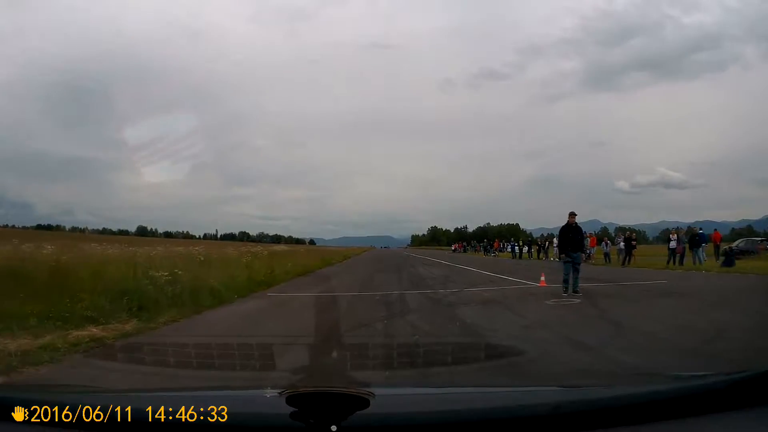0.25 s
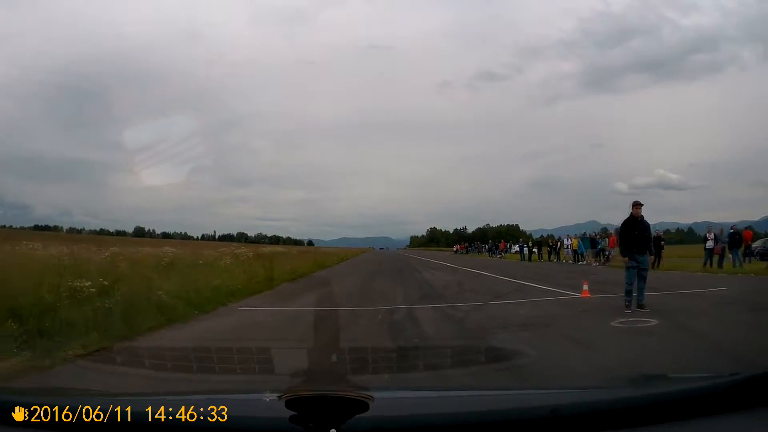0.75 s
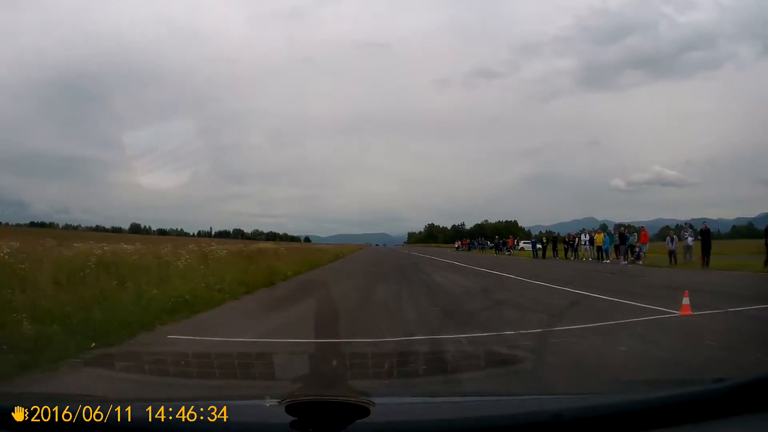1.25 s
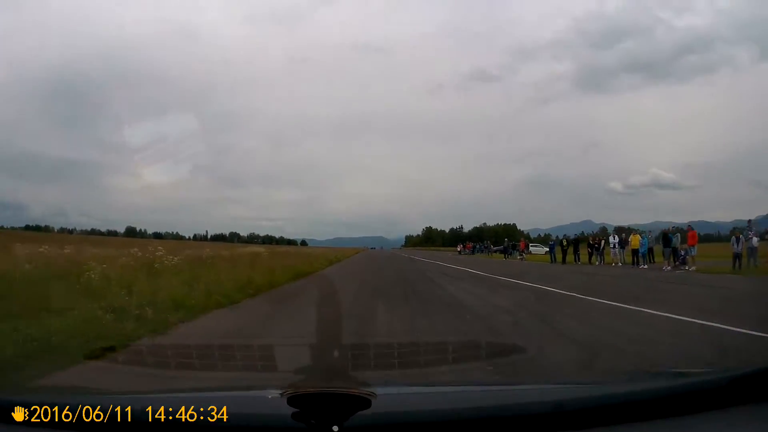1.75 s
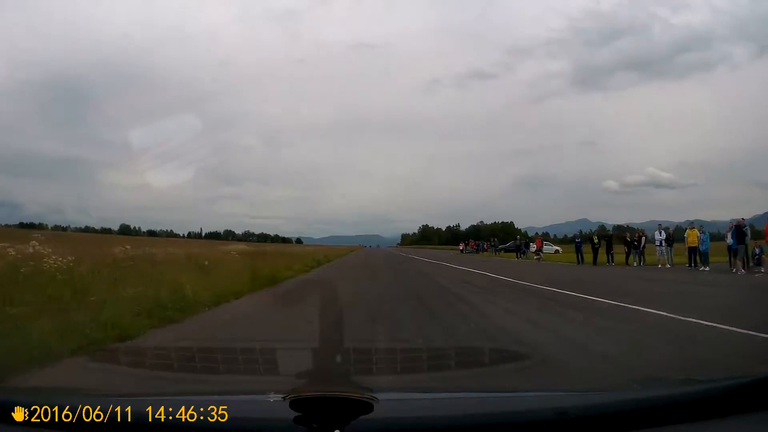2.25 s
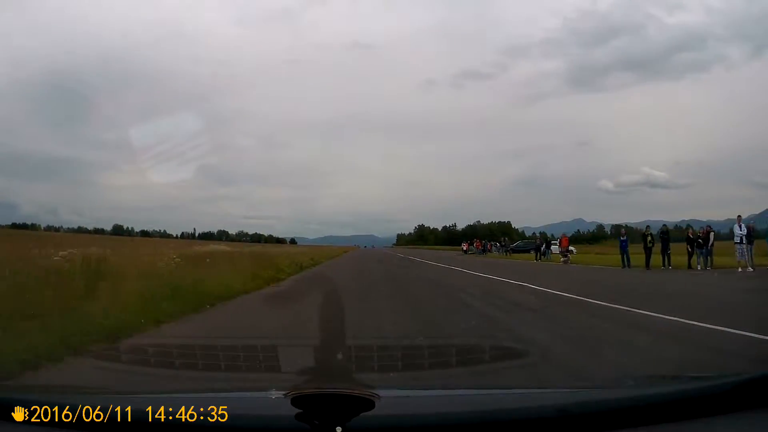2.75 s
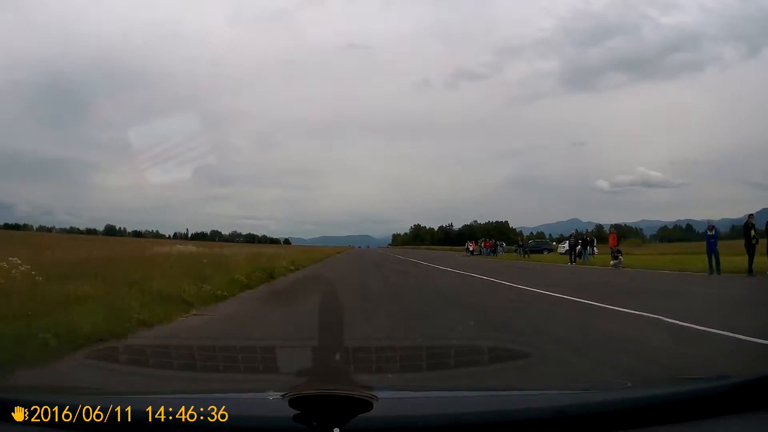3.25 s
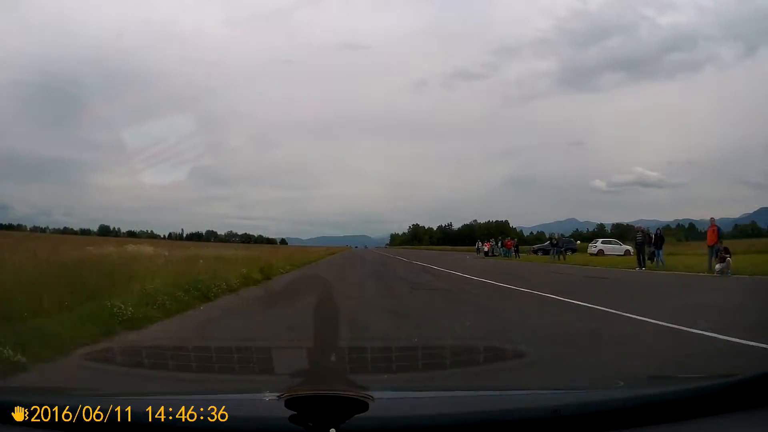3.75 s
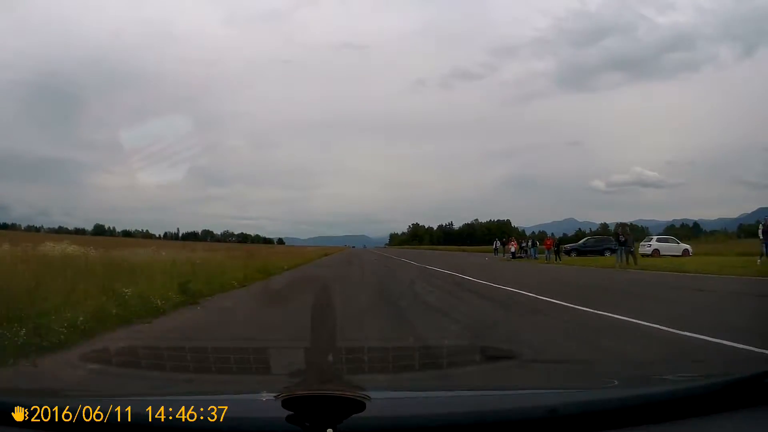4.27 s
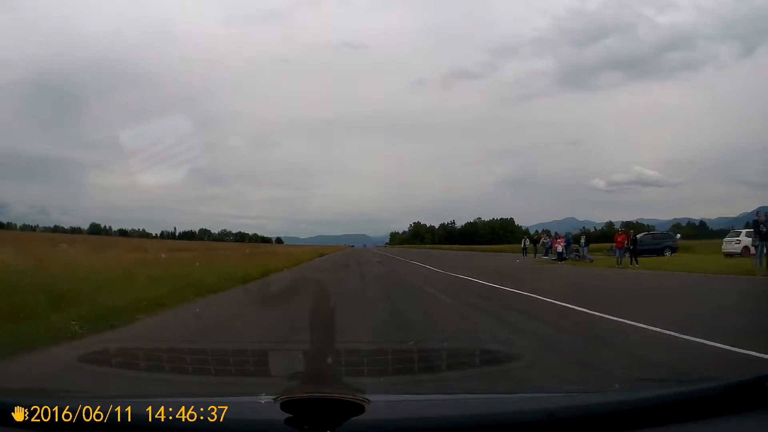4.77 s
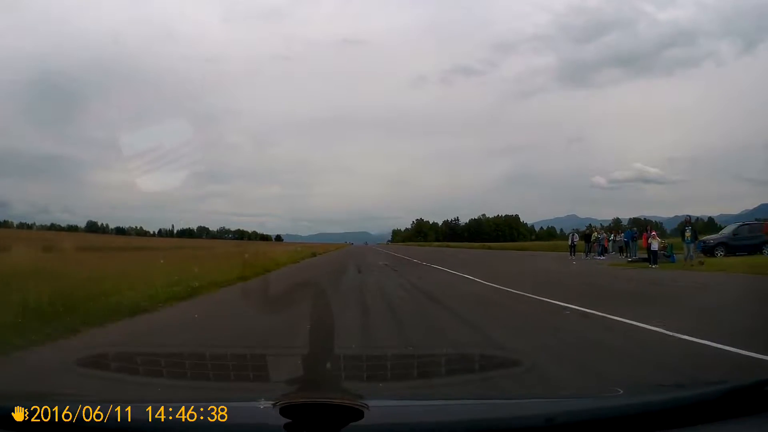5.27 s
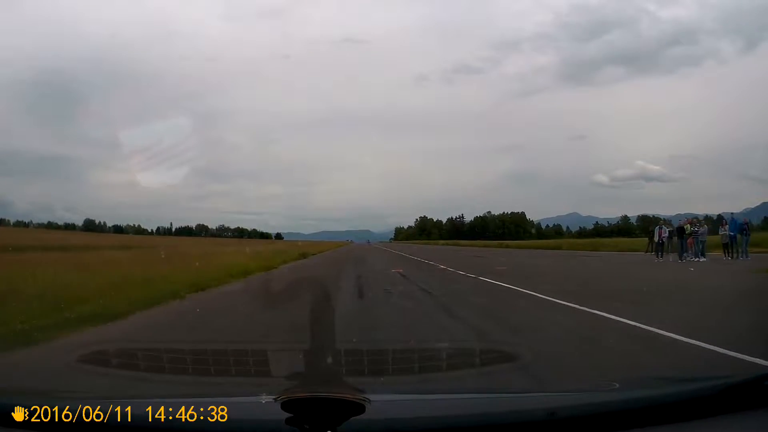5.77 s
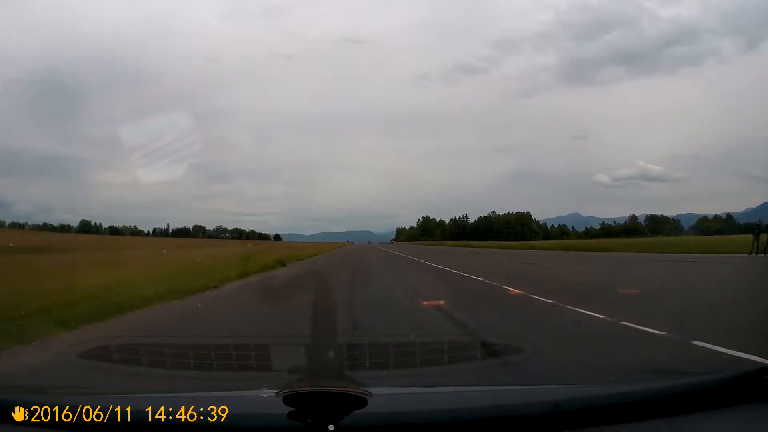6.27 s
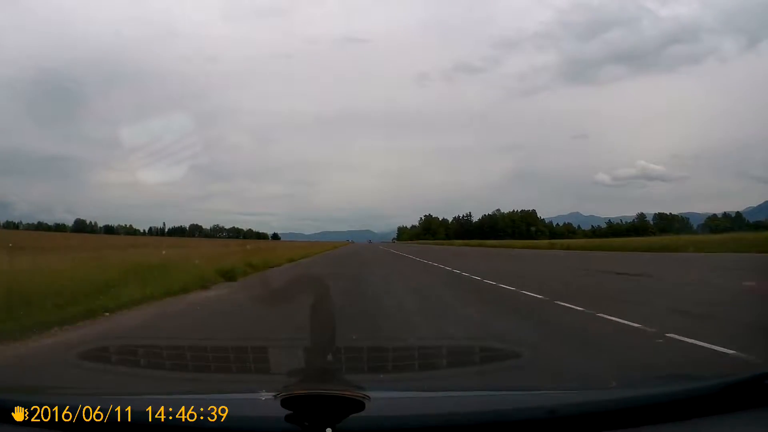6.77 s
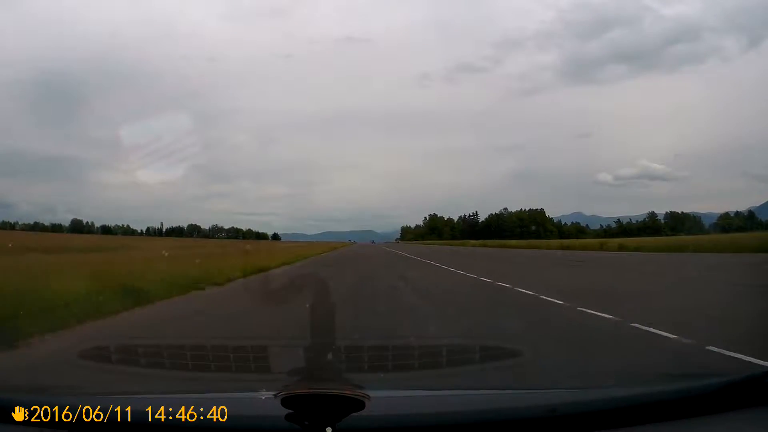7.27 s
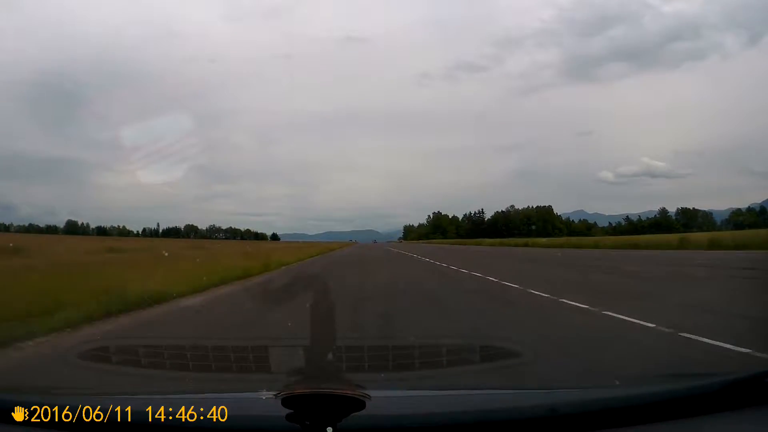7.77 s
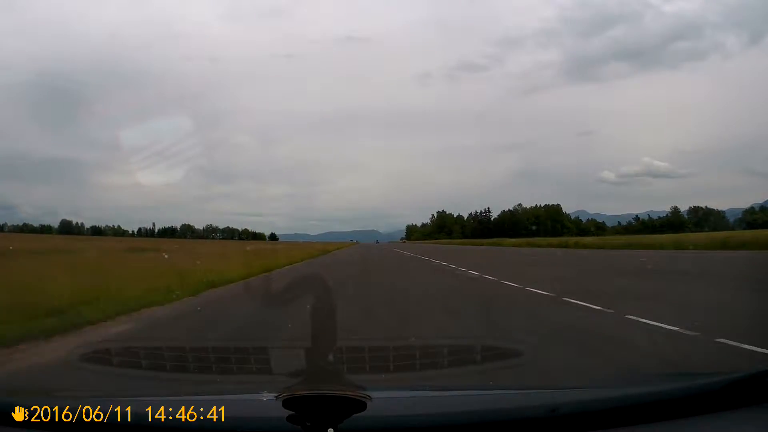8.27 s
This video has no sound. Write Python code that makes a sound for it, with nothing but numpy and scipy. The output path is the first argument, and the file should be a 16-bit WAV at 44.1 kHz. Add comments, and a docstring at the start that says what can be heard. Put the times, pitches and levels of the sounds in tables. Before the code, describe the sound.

A four-cylinder turbodiesel car revs up and launches, heard from a microphone on the windscreen. The wheels hop in rapid, distorted thumps while the dashboard slaps, trim knocks and the microphone's mount crackles up close. The engine bogs down, then climbs with a booming growl. A hard upshift brings knocks and a shudder, and the engine pulls again from a lower pitch over tyre roar and light ticking.

```python
"""Inside a four-cylinder turbodiesel car on a runway, the microphone in a camera on the windscreen.
The car launches; from 0.6 s the driven wheels hop and shake the body, overloading the microphone.
The dashboard slaps just below it, trim knocks, and the shaken camera crackles right at the capsule.
The engine bogs near 2 s, pulls through the gear, takes a hard upshift at 5.3 s and pulls again
over growing road roar, its firings booming and growling through the cabin."""
import sys
import numpy as np
from scipy import signal
from scipy.fft import rfft, irfft, next_fast_len
from scipy.io import wavfile
from scipy.ndimage import map_coordinates

SR = 44100
rng = np.random.default_rng(int(sys.argv[2]) if len(sys.argv) > 2 else 0)


def to_wav(sig):
    """Store sig (one row per channel, or 1-D mono) as 16-bit WAV at the path in sys.argv[1].

    Samples outside -1..1 are clipped; the rate is SR.
    """
    pcm = np.clip(np.atleast_2d(sig), -1, 1) * 32767
    pcm = np.round(pcm).astype(np.int16)
    wavfile.write(sys.argv[1], SR, pcm.T)  # frames by channels


N = 375732

# The runway under the car: (time [s], body rumble [dB], tyre roar relative to the growl [dB])
ROAD_LEVELS = [(0, -30.5, -0.5), (1.4, -28, -2), (2.2, -36, -1), (3.3, -34.5, -3.5), (4.8, -35.5, -4),
               (5.7, -40, -0.5), (6.2, -32, -0.5), (7.2, -32, -1.5), (8.5, -33.5, -2)]
# The clutch takes up, lets go and bites again: (time [s], length [s], rumble [dB], shudder [dB],
# dashboard rattle [dB], camera chatter [dB], throttle lift [0-1])
CLUTCH_LURCHES = [(0, 0.17, -42, -39.5, -48.5, -79, 0), (0.645, 0.53, -22, -45, -38, -37, 0.7),
                  (1.212, 0.083, -29, -38, -31, -60, 0.7), (1.44, 0.12, -29, -39, -29.5, -32.5, 0.2),
                  (1.584, .3, -29, -32, -42.5, -56, 0.6), (5.105, 0.2, -40, -41, -40.5, -49, 0.2),
                  (5.337, 0.19, -30, -22, -57, -65, .35)]
# Noise spectra, each (frequency [Hz], relative density [dB])
TYRE_SPECTRUM = [(30, -31.5), (70, -2), (115, 4.5), (160, -1), (200, -4.5), (320, -5), (450, -7),
                 (600, -11.5), (1200, -55.5), (4000, -100)]  # tyres, heard through the floor
RUMBLE_SPECTRUM = [(14, -24.5), (27, -1.5), (33, 0.5), (41, 2), (50, -3.5), (70, -7), (160, -40.5),
                   (1000, -120)]  # the body shell
RATTLE_SPECTRUM = [(200, -3), (510, 0.5), (680, -1), (860, 0), (1000, -12.5), (1120, -1.5), (1300, -10),
                   (1490, -8), (1750, -11.5), (1990, -19), (2600, -27.5), (3600, -30), (5000, -33.5),
                   (11000, -43.5), (15000, -66)]  # loose dashboard panels
SLAP_SPECTRUM = [(200, -10), (600, 6.5), (1000, 13.5), (1600, -1), (2600, -20), (4000, -23.5), (9000, -33),
                 (14000, -52.5)]  # the dashboard hitting its seat
COMBUSTION_SPECTRUM = [(250, -7), (450, 0.5), (650, -1.5), (850, -4), (1150, -4.5), (1450, -11.5),
                       (1800, -18), (2400, -26.5), (3000, -33.5), (4500, -44.5), (8000, -55.5),
                       (12000, -95.5)]  # firings, heard through the bulkhead
DULL_SCUFF = [(200, -9), (600, 4.5), (950, 5), (1300, -11), (1700, -16), (2100, -16), (2700, -19),
              (3600, -33), (4500, -30), (5500, -48), (12000, -65.5)]  # trim contact, dull part and bright part
BRIGHT_SCUFF = [(800, -33), (1600, 6), (2600, 1.5), (3000, -8), (3500, -7.5), (3900, -13), (4300, -7),
                (5000, -34), (12000, -51.5)]
HISS_SPECTRUM = [(1000, 0), (10000, 0), (12000, -6), (15000, -10), (16000, -30)]  # microphone self-noise
# Ringing parts, each (frequency [Hz], relative level [dB], t60 [s])
METAL_MODES = [(2600, 2, .05), (2880, 7.5, 0.046), (3052, 0, 0.059), (3472, 5.5, 0.056), (3880, -3, .05),
               (4285, -6, 0.12), (4430, -10, .06)]  # a small loose piece
TRIM_MODES = [(565, -3.5, 0.075), (858, 3, 0.049), (1031, 4.5, 0.034), (1240, -8, 0.057),
              (1630, -20, 0.0033), (2000, -19, 0.016), (2530, -14, 0.023), (2820, -17.5, 0.036)]  # gear lever and plastic trim
PANEL_MODES = [(329, 0, .09), (377, -2.5, 0.1), (516, -3, 0.082), (620, -1, .09), (805, -1.5, .05),
               (943, -5, 0.057), (977, -1, 0.058), (1112, -5, .08), (1217, -6, .07), (1490, -5.5, .09),
               (1980, -18.5, 0.1), (2480, -18, .05)]  # dashboard
CASE_MODES = [(3650, -24, .016), (5160, -29, 0.016), (7160, -31.5, .01), (8500, -29.5, 0.0095)]  # camera case
MOUNT_MODES = [(120, 7, 0.12), (153, 3, 0.14), (233, -7.5, 0.024), (311, -5, 0.098), (400, -13.5, 0.1),
               (518, -0.5, 0.069), (620, -8, 0.07)]  # engine mounts
# Lever and trim blows: (time [s], relative level [dB], bright scuff [dB], pitch [ratio])
TRIM_KNOCKS = [(.566, -15.5, -20, 0.55), (1.249, -15.5, -24, 1.22), (1.276, -9, -15, 1.4),
               (1.291, -18.5, -26, 1.13), (1.307, -7, -11.5, 0.97), (2.498, -23, -8, 1.24),
               (2.975, -43, 3, 1.4), (5.083, -29.5, 4, 1.1), (5.208, -12.5, -20, 1.01),
               (5.243, -6.5, -13, .9), (5.446, -37, 3, 1.4)]
# Dashboard blows: (time [s], relative level [dB])
DASH_SLAPS = [(0.732, -12), (0.802, -9.5), (0.843, -3.5), (0.85, -3.5), (0.9308, -10), (0.939, -10),
              (1.022, -11.5), (1.027, -8.5), (1.106, -18), (1.216, -17.5), (1.226, -18.5), (1.453, -13.5),
              (1.460, -11.5), (1.474, -14), (1.488, -18), (1.51, -19), (1.522, -24.5), (1.54, -21)]
# The camera strikes its mount: (time [s], level [dB], buzz length [s])
CAMERA_TICKS = [(0.836, -13, .006), (0.969, -24, 0.0034), (1.077, -30.5, 0.0032), (1.097, -19, 0.0045),
                (1.110, -25, 0.011), (1.159, -33.5, 0.0032), (1.227, -18, 0.0024), (1.268, -24, .004),
                (1.302, -24, .003), (1.350, -35, .003), (1.381, -24.5, .004), (1.449, -16.5, 0.0026),
                (1.461, -16, 0.018), (1.492, -17, .007), (1.526, -22, 0.02), (1.560, -17, .003),
                (1.572, -16.5, 0.0033), (1.583, -23.5, .008), (1.620, -20.5, .003), (1.643, -19.5, 0.021),
                (1.680, -20, 0.0077), (1.704, -22, 0.017), (1.745, -20, 0.0035), (1.762, -23.5, .006),
                (1.773, -21.5, 0.011), (1.798, -19.5, 0.0036), (1.824, -28, 0.0053), (1.834, -27.5, 0.0064),
                (1.856, -25.5, 0.011), (1.880, -25.5, 0.015), (1.913, -24, .003), (1.921, -22, 0.0035),
                (1.937, -25, 0.0042), (1.949, -32.5, .003), (1.993, -22.5, 0.014), (2.047, -24.5, 0.0033),
                (2.103, -32, 0.012), (2.153, -40, .003), (4.259, -48, 0.0036), (4.687, -46.5, .006),
                (4.876, -49.5, .006), (4.914, -43, .006), (5.123, -26.5, 0.014), (5.146, -29, .004),
                (5.175, -27, .009), (5.228, -25.5, 0.0095), (5.283, -31, .006), (5.308, -35, .003),
                (5.337, -18, 0.0027), (5.345, -28, 0.0034), (5.361, -32, 0.0076), (5.388, -26.5, 0.0089),
                (5.414, -38, .003), (5.436, -41, .01), (5.543, -38, .005), (5.605, -28, 0.0062),
                (5.655, -37, 0.0058), (5.765, -32.5, .005), (5.867, -42, .005), (6.131, -39, 0.0066),
                (6.168, -35, 0.0023), (6.206, -35, 0.0027), (6.228, -34, 0.0046), (6.240, -39, 0.0086),
                (6.406, -44, .004), (6.424, -42, .007), (6.506, -37, .007), (6.560, -31.5, 0.017),
                (6.773, -33.5, .004), (6.794, -40, .004), (6.825, -36, .007), (7.007, -41, .005),
                (7.433, -33.5, .005), (7.452, -40, 0.0054), (7.474, -33, .005), (7.497, -31, .005),
                (7.511, -31, 0.0046), (7.577, -35, 0.0058), (7.613, -37, 0.0046), (7.715, -36.5, 0.0057),
                (7.919, -35.5, .005), (8.022, -31, 0.0097), (8.378, -44.5, .009)]
# The camera's responses, each (frequency [Hz], gain [dB])
CASE_COLOUR = [(300, -50), (1500, -9), (2400, 0.5), (3000, 1), (3650, 9), (4500, -5.5), (5200, 5),
               (6200, -2), (7200, 0.5), (7900, -2), (8700, -3.5), (10000, -8), (11500, -13.5),
               (12600, -21.5), (13600, -14.5), (15500, -38)]  # its case, tapped
CHATTER_COLOUR = [(300, -45.5), (1500, -12), (2400, 1.5), (3000, 1), (3700, 7), (4500, -10), (5200, 3),
                  (6200, -6), (7200, 0.5), (9900, 2.5), (11400, -4), (12500, -17.5), (13700, -8.5),
                  (15500, -35.5)]  # its case, struck hard
TREBLE_ROLLOFF = [(14000, 0), (15700, -14)]  # its dull top end
# The tyres regain grip: (time [s], length [s], shake [dB], shake rate [Hz], mount knock [dB],
# relative rattle [dB])
WHEEL_HOPS = [(0.636, 0.061, -7.5, 52.3, -14, -17.5), (0.721, 0.059, -2, 55.1, -4, -11.5),
              (0.803, .054, -1, 54.77, -0.5, -7.5), (.889, .053, -1, 52.2, 1, -9),
              (0.978, 0.044, -0.5, 52.25, -4.5, -11.5), (1.068, 0.047, -6, 50.8, -7.5, -16.5),
              (1.194, 0.041, -5, 49.5, -7.5, -15), (1.439, 0.03, -2.5, 37.97, -15.5, -17)]
# Launch, bog, pull, upshift, pull, at four firings a cycle: (time [s], cycle rate [Hz])
ENGINE_SPEED = [(0, 21), (.12, 22), (.25, 26.3), (.4, 30.5), (.6, 35.6), (.92, 34), (1.15, 36.3),
                (1.35, 38.7), (1.5, 36), (1.6, 30), (1.8, 21.2), (2, 19.3), (2.4, 21.8), (2.9, 25.3),
                (3.3, 27.9), (3.95, 31.8), (4.55, 34.86), (5.08, 37), (5.2, 39.4), (5.28, 36.8),
                (5.355, 40), (5.42, 35.3), (5.48, 30.8), (5.525, 30), (5.55, 24.8), (5.75, 25.2),
                (7.4, 29.5), (8.52, 32.05)]
# Harmonics of the unequal cylinders: (order [multiple of the cycle rate], relative level [dB])
ENGINE_ORDERS = [(2, 3), (3, 5), (5, 8), (6, -2), (7, 4), (9, 0.5), (10, -3), (11, -0.5), (12, .5),
                 (13, -8), (14, 1), (15, -4), (16, -6), (17, -9.5), (18, -3.5), (19, -4), (20, -2.5),
                 (22, -9), (23, -4.5), (24, -6.5), (25, -3.5), (26, -8), (28, -1), (31, 0), (32, 1),
                 (36, -4), (40, -8)]
# Cabin resonances at the windscreen, each (frequency [Hz], level [dB])
CABIN_GROWL = [(45, -8.5), (90, -13.5), (130, -3.5), (170, -10.5), (205, -3), (250, 4.0), (280, -6.5),
               (305, -0.5), (335, -1), (365, 9), (395, -1.5), (430, 9), (470, -1), (510, 2.5), (570, 0.5),
               (640, -3.5), (730, -2.5), (850, -5), (1100, -10), (1400, -10.5)]  # for the orders
CABIN_BOOM = [(79, -50), (92, -41.5), (107, -29.5), (114, -30.5), (127, -21.5), (137, -25), (146, -17.5),
              (155, -22.5)]  # for the firing rate
CABIN_OCTAVE = [(156, -37), (170, -30), (186, -33), (210, -30.5), (228, -35), (247, -28.5), (263, -37),
                (288, -34.5), (305, -30)]  # for its octave


def amp(db):
    """Decibels to gain."""
    return 10 ** (np.asarray(db) / 20)


def unit(x):
    """Scaled to rms 1."""
    return x / np.sqrt(np.mean(x ** 2) + 1e-20)


def along(points, hz):
    """(Hz, value) points read on a log axis."""
    f, v = np.transpose(points)
    return np.interp(np.log(hz + 1), np.log(f + 1), v)


def curves(rows):
    """One value per sample for each column after the time."""
    s, *cols = np.transpose(rows)
    return [np.interp(np.arange(N) / SR, s, c) for c in cols]


def wobble(rate):
    """A smooth random curve, rate knots a second."""
    return map_coordinates(rng.standard_normal(int(N * rate / SR) + 4), [np.arange(N) * rate / SR])


def filtered(x, response):
    """x through a gain that depends on frequency."""
    size = next_fast_len(N + SR // 2)
    return irfft(rfft(x, size) * response(np.fft.rfftfreq(size, 1 / SR)), size)[:N]


def noise(spectrum):
    """Coloured noise of rms 1."""
    return unit(filtered(rng.standard_normal(N), lambda hz: amp(along(spectrum, hz))))


def click(spectrum, size=512):
    """The shortest causal pulse with this colour, peak 1."""
    cepstrum = irfft(np.log(amp(along(spectrum, np.fft.rfftfreq(size, 1 / SR)))))
    causal = 2 * cepstrum[:size // 2] * (np.arange(size // 2) > 0)
    pulse = irfft(np.exp(rfft(causal, size)))
    return pulse / np.abs(pulse).max()


def ring(modes, t, scatter_db):
    """The decaying modes of a struck part, their strengths scattered at each blow."""
    hz, db, t60 = np.transpose(modes)[:, :, None]
    struck_db = db + scatter_db * rng.standard_normal(db.shape)
    return (amp(struck_db - 60 * t / t60) * np.sin(2 * np.pi * hz * t)).sum(0)


def add(track, s, sound):
    """Mix a sound into the track at time s."""
    part = track[round(s * SR):][:len(sound)]
    part += sound[:len(part)]


def microphone_hiss():
    """The microphone's own noise floor, far beneath the car."""
    return amp(-75.5) * noise(HISS_SPECTRUM)


def road(roar_db, rumble, shudder, rattle, shudder_hz=38):
    """Tyres roar below, the body rumbles all round; clutch shudder and dashboard rattle join in."""
    roar = amp(roar_db + 0.55 + 0.68 * wobble(10)) * noise(TYRE_SPECTRUM)
    swing = np.sin(2 * np.pi * shudder_hz * np.arange(N) / SR + 0.16 * wobble(30))
    flutter = amp(3.8 * wobble(45))
    body = rumble * noise(RUMBLE_SPECTRUM) + shudder * swing
    return roar + body + rattle * flutter * noise(RATTLE_SPECTRUM)


def lurches(attack_s=0.061, t60=0.41):
    """Each drivetrain lurch swells, holds and dies: rumble, shudder, rattle, chatter and lift curves."""
    t = np.arange(N) / SR
    total = np.zeros((5, N))
    for s, length, *levels_db, lift in CLUTCH_LURCHES:
        swell = np.clip((t - s) / attack_s + 0.5, 0, 1)
        release = amp(-60 * np.maximum(t - s - length, 0) / t60)
        total += np.outer([*amp(levels_db), lift], swell * release)
    return total


def metal_clink(at_s=2.503):
    """A small loose piece of metal is jogged and rings faintly in the cabin."""
    out = np.zeros(N)
    add(out, at_s, amp(-51.5) * ring(METAL_MODES, np.arange(SR // 5) / SR, scatter_db=2))
    return out


def trim_knocks(attack_s=0.0025, hold_s=0.0056, scuff_t60=0.054):
    """At arm's length, lever and trim strike with a short scuff and a dead plastic ring."""
    t = np.arange(SR // 5) / SR
    out = np.zeros(N)
    dull, bright = noise(DULL_SCUFF), noise(BRIGHT_SCUFF)
    onset = 1 - np.exp(-t / attack_s)
    fade = amp(-60 * np.maximum(t - hold_s, 0) / scuff_t60)
    for s, db, bright_db, pitch in TRIM_KNOCKS:
        scuff = (0.5 * dull + amp(bright_db) * bright)[round(s * SR):][:len(t)]
        plastic = 2.23 * ring(TRIM_MODES, t * pitch, scatter_db=2)
        add(out, s, amp(db - 11) * (plastic + scuff * fade) * onset)
    return out


def dashboard_slaps(crack_t60=0.0093, damping_t60=0.054):
    """Just below the microphone the dashboard slaps its seat: a dry crack, then ringing panels."""
    t = np.arange(SR // 8) / SR
    crack, panels = np.zeros((2, N))
    for s, db in DASH_SLAPS:
        add(crack, s, amp(db - 2.5 - 60 * t / crack_t60))
        add(panels, s, amp(db - 10 - 60 * t / damping_t60) * ring(PANEL_MODES, t, scatter_db=0))
    return crack * noise(SLAP_SPECTRUM) + panels


def camera_tick(db, length, gap_scatter, level_scatter, bounce_s=0.0034):
    """Impulses of the camera striking its mount, then rebounding in a fading buzz."""
    out = np.zeros(SR // 10)
    out[0] = amp(db)
    delays = np.cumsum(bounce_s * np.exp(0.3 * gap_scatter))
    rebounds_db = db - 3.5 - 14 * (delays / length) ** 2 + 2 * level_scatter
    for delay, rebound_db in zip(delays, rebounds_db):
        add(out, delay, amp([rebound_db]))
    return out


def camera_crackle(jolt, lurch_chatter, contacts_per_s=400, cabin_t60=0.082):
    """Right at the capsule the shaken case ticks, over a fine, brighter chatter that jolts stir up."""
    road_chatter = amp(-89 + 1.5 * np.arange(N) / SR)  # creeps up with time
    shaking = amp(-22.5) * jolt + lurch_chatter + road_chatter
    sizes = shaking * amp(2.8 * rng.standard_normal(N))
    contacts = sizes * (rng.random(N) < contacts_per_s / SR) * np.sign(rng.standard_normal(N))
    chatter = signal.fftconvolve(contacts, click(CHATTER_COLOUR))[:N]
    ticks = np.zeros(N)
    for s, db, length in CAMERA_TICKS:
        add(ticks, s, camera_tick(db, length, *rng.standard_normal((2, 10))))
    # each tick rings the case and scatters round the cabin
    t = np.arange(SR // 10) / SR
    response = ring(CASE_MODES, t, scatter_db=1)
    tap = click(CASE_COLOUR)
    cabin_tail = amp(-36 - 60 * t / cabin_t60) * rng.standard_normal(len(t))
    add(response, 0, tap)
    add(response, 0, signal.fftconvolve(cabin_tail, tap))
    return signal.fftconvolve(ticks, response)[:N] + chatter


def wheel_hop(edge_s=0.012, lag_s=0.002444):
    """The tyres regain grip, the engine bangs on its mounts, the body swings: sound and jolt curve."""
    t = np.arange(SR // 4) / SR
    body, rattle, jolt = np.zeros((3, N))
    knock_onset = 1 - np.exp(-t / 0.0031)
    tail = 0.14 * amp(-60 * t / 0.16)
    for s, length, shake_db, shake_hz, knock_db, rattle_db in WHEEL_HOPS:
        window = np.clip(t / edge_s, 0, 1) * np.clip((length - t) / (2 * edge_s) + 0.5, 0, 1)
        swing = np.sin(2 * np.pi * shake_hz * t)
        thud = 0.61 * (swing ** 2 - 0.5)  # a lopsided swing adds twice its rate
        add(body, s + lag_s, amp(shake_db) * (window + tail) * (swing + thud))
        add(body, s, -amp(knock_db) * ring(MOUNT_MODES, t, scatter_db=2) * knock_onset)
        for k in range(3):  # loose panels knock once a swing
            panels = amp(rattle_db - 12.5 - 3.3 * k) * ring(PANEL_MODES, t, scatter_db=0.5)
            add(body, s + lag_s + k / shake_hz, panels)
        add(rattle, s, amp(rattle_db - 9.5) * window * (1 + np.maximum(swing, 0) ** 2))
        add(jolt, s, amp(shake_db / 2 - 60 * t / 0.5) * window)
    return body + rattle * noise(RATTLE_SPECTRUM), jolt


def engine_load(cycle_hz, lift, mid_speed_hz=30, upshift_s=5.32, load_rise_s=0.71):
    """Speed raises both levels; a throttle lift softens the growl, the high gear hardens combustion."""
    octaves = np.log2(cycle_hz / mid_speed_hz)
    high_gear = np.clip((np.arange(N) / SR - upshift_s) / load_rise_s, 0, 1)
    growl_db = -27.35 + 7.5 * octaves - 4.5 * lift
    combustion_db = -37.37 + 7 * octaves + 3 * high_gear
    return growl_db, combustion_db


def cabin_boom(cycle_hz, phase, lift):
    """The firing rate and its octave boom; off throttle the engine rocks and the boom flutters."""
    flutter_db = 8.5 * lift * wobble(45) + 1.7 * wobble(22)
    boom_db = along(CABIN_BOOM, 4 * cycle_hz) - 2.5 * lift + flutter_db
    octave_db = along(CABIN_OCTAVE, 8 * cycle_hz) - 8 * lift + wobble(21)
    return np.sqrt(2) * (amp(boom_db) * np.sin(4 * phase) + amp(octave_db) * np.sin(8 * phase))


def cylinder_growl(cycle_hz, phase, rough_order=42, evenness=0.18):
    """Unequal cylinders make orders that swell as they sweep through the cabin's resonances."""
    growl, power = np.zeros((2, N))
    for order, db in ENGINE_ORDERS:
        roughness = (order / rough_order) ** 2  # high orders are weaker and less steady
        size = amp(db + along(CABIN_GROWL, order * cycle_hz) - 13.2 * roughness)
        flicker = amp((2 + 0.025 * order) * wobble(7))
        drift = 2 * np.pi * rng.random() + (0.023 + roughness) * wobble(40)
        growl += size * flicker * np.sin(order * phase + drift)
        power += size ** 2 / 2
    return unit(growl / power ** evenness)


def engine(cycle_hz, growl_db, combustion_db, lift):
    """The diesel just beyond the bulkhead: boom, growl and a puff of noise at each firing."""
    jitter = 0.002 * wobble(25) + 0.009 * lift * wobble(40)  # less even off the throttle
    phase = 2 * np.pi * (np.cumsum(cycle_hz) / SR + jitter)
    boom = cabin_boom(cycle_hz, phase, lift)
    growl = amp(growl_db) * cylinder_growl(cycle_hz, phase)
    # one cylinder knocks harder than the others
    puffs = unit(amp(0.54 * np.cos(4 * phase) + 0.71 * np.cos(phase) + 0.78 * np.cos(2 * phase)))
    return boom + growl + amp(combustion_db) * puffs * noise(COMBUSTION_SPECTRUM)


def scene():
    """Engine, runway and shaken cabin meet at one microphone on the windscreen."""
    cycle_hz, = curves(ENGINE_SPEED)
    rumble_db, tyre_db = curves(ROAD_LEVELS)
    heave, shudder, rattle, chatter, lift = lurches()
    growl_db, combustion_db = engine_load(cycle_hz, lift)
    hops, jolt = wheel_hop()
    diesel = engine(cycle_hz, growl_db, combustion_db, lift)
    rolling = road(growl_db + tyre_db, amp(rumble_db) + heave, shudder, rattle)
    close_by = dashboard_slaps() + trim_knocks() + metal_clink() + camera_crackle(jolt, chatter)
    return (microphone_hiss() + rolling + close_by + hops + diesel)[None]


def record(dry, band_limit_hz=15700):
    """The camera's microphone overloads at full scale; nothing above the band limit is kept."""
    limited = dry[0] / (1 + np.abs(dry[0]) ** 12) ** (1 / 12)
    return filtered(limited, lambda hz: amp(along(TREBLE_ROLLOFF, hz)) * (hz < band_limit_hz))[None]


dry = scene()
out = record(dry)
to_wav(out)
```